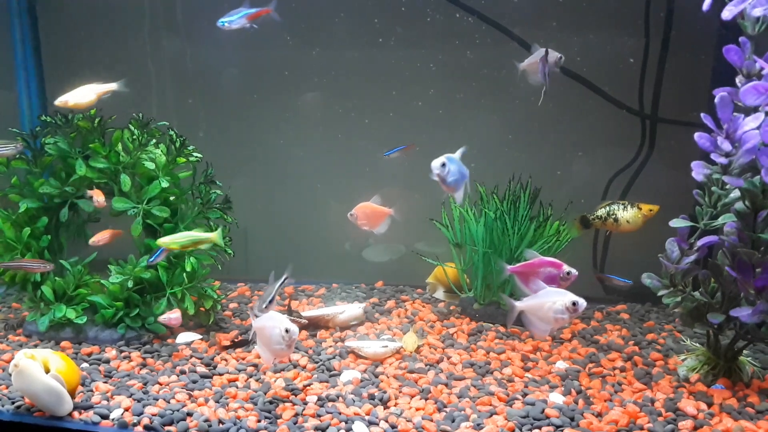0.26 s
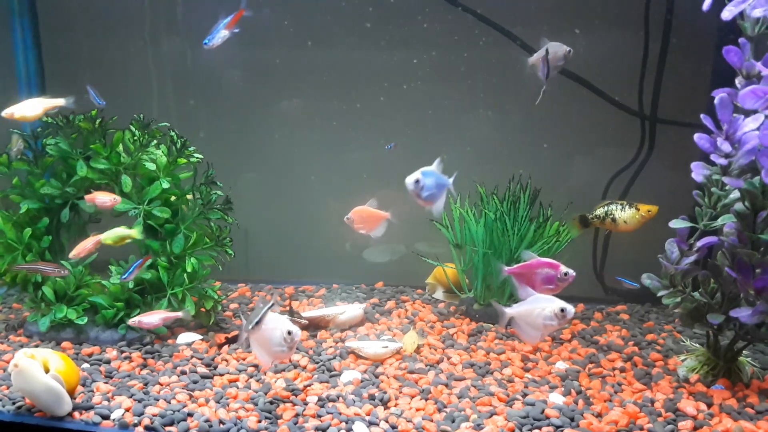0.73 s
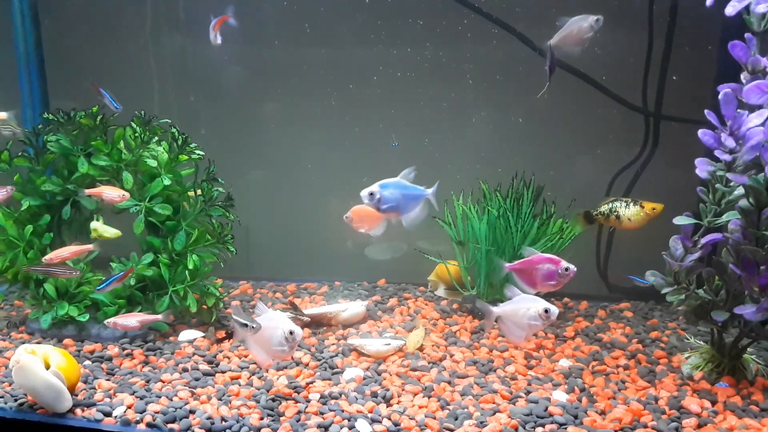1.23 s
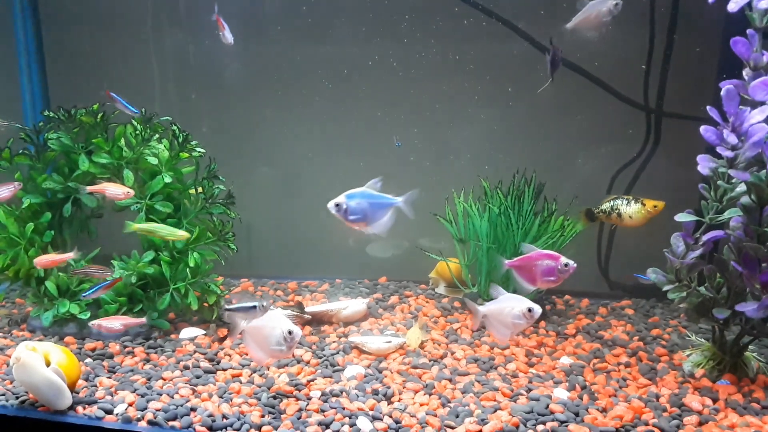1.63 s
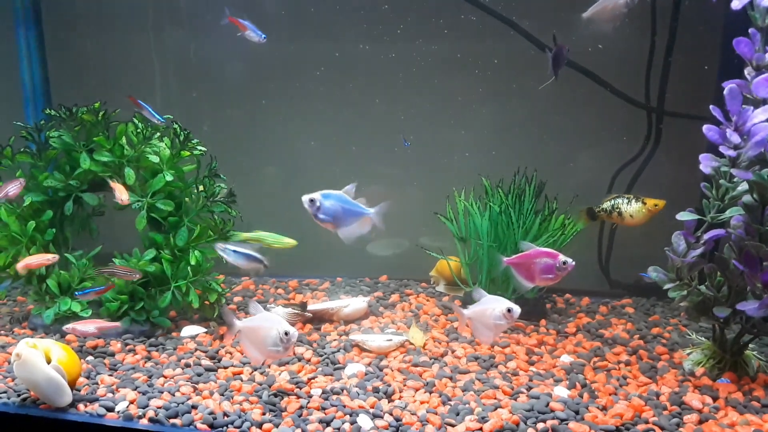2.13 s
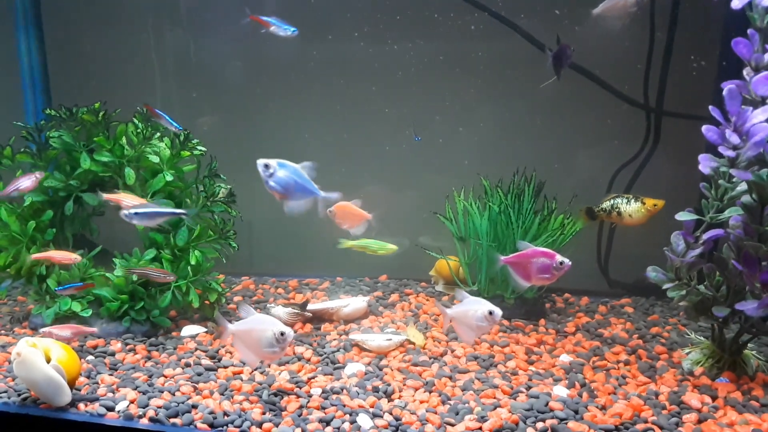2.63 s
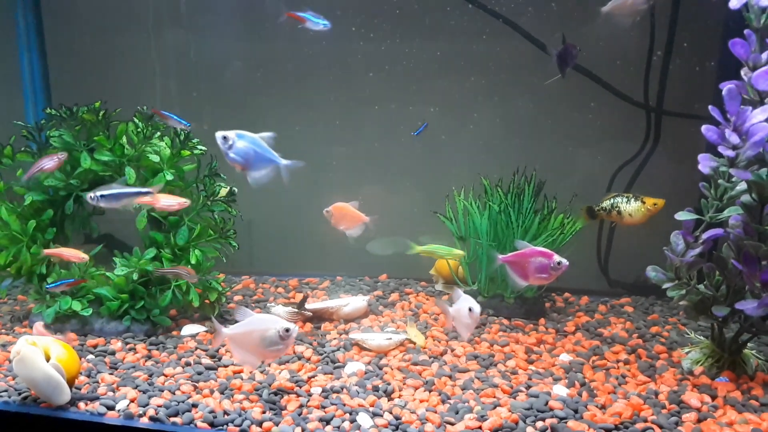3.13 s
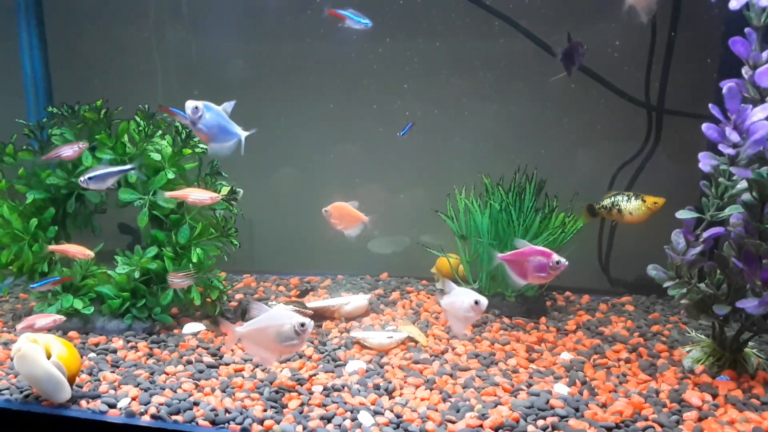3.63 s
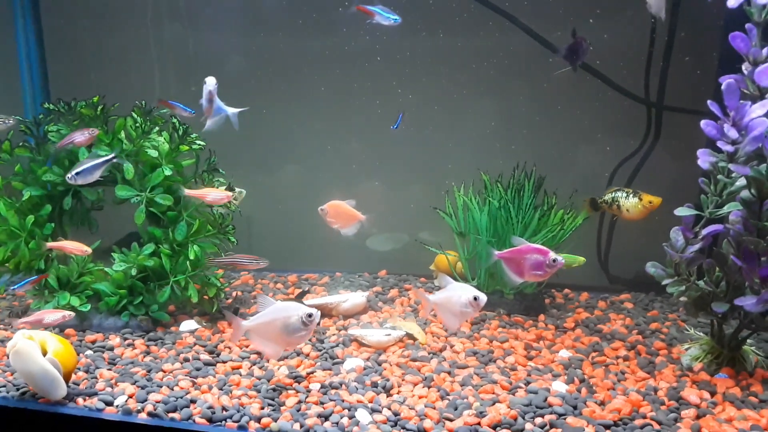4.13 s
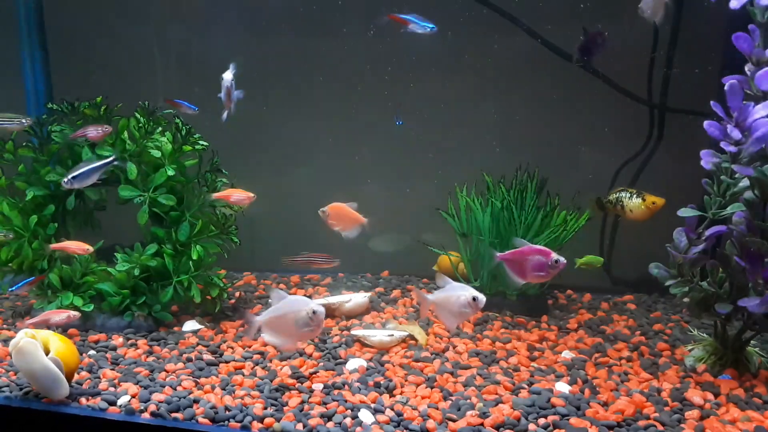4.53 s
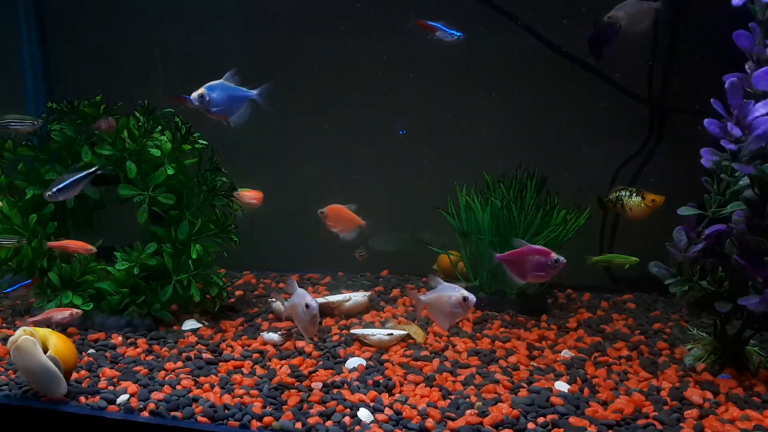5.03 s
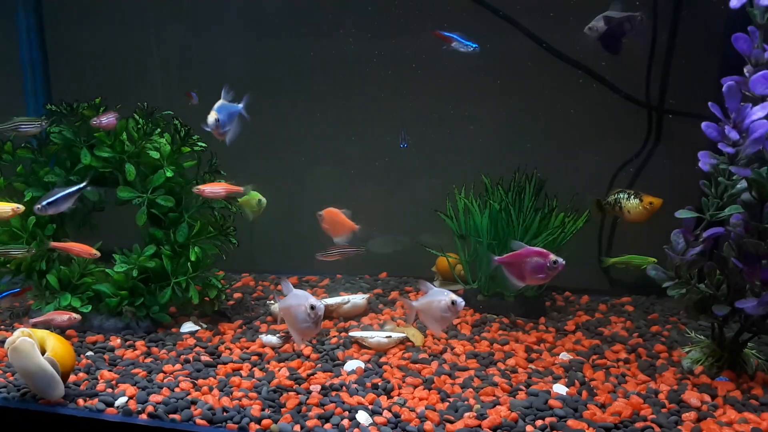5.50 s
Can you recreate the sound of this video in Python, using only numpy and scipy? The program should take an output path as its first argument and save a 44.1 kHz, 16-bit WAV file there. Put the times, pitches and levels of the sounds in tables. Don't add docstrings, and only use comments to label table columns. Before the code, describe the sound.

A very quiet, close stereo sound of a home aquarium, about six seconds long. From start to end a pump hums at one low, unwavering pitch near 200 Hz, with soft low rumble from its case and the room and a little hiss, stronger at left. Bubbles burst constantly but irregularly at the surface: tiny high ticks, bright wet plinks and a few rounder, lower pops, over a thin continuous fizz. They lean right, and the lid and small room give them a short, slightly resonant smear. Clearer pops stand out around 2.3, 2.6 and 5.5 seconds, with busy little clusters near 1.0 and 4.6. A lone soft knock on the wooden stand comes at 3.4, then a loose group of dull low knocks from 3.9 to 4.2, another around 4.6, and a deep, longer thud at 5.7. The hum simply continues to the end.

```python
import sys
import numpy as np
from scipy import signal
from scipy.fft import rfft, irfft
from scipy.io import wavfile

SR = 44100
rng = np.random.default_rng(int(sys.argv[2]) if len(sys.argv) > 2 else 0)


def nominal_scale(level):
    x = np.asarray(level, float) / 20
    return 10 ** x


def dump(signal):
    limited = np.clip(np.atleast_2d(signal).T, -1, 1)
    pcm = np.round(limited * 32767).astype(np.int16)
    wavfile.write(sys.argv[1], SR, pcm)


N = 254016

HUM_HZ = [150.1, 200.134, 400.268, 387.6]
# level_db (rms), left_minus_right_db
HUM_LEVELS = [(-87, -13.5), (-50, 2), (-89.5, 3), (-77.5, -0.5)]
HUM_LEAD_RAD = 0.082

# start_s, peak_db, pitch_hz
LARGE = [(0.045, -57, 975), (0.159, -62, 1060), (0.48, -62, 1380), (1.03, -60, 995), (1.28, -61, 910),
         (1.5, -65, 1040), (1.84, -67, 1180), (1.934, -59, 1110), (2.547, -61.5, 1280), (2.644, -61, 1150),
         (2.774, -64, 1140), (2.85, -61.5, 1130), (3.13, -63, 1070), (3.548, -61, 918), (3.816, -59, 1000),
         (4.068, -57, 945), (4.258, -62, 945), (4.463, -61.5, 1320), (4.578, -62, 970), (4.639, -55, 1330),
         (4.803, -63.5, 955), (4.861, -62, 910), (5.082, -56.5, 1050), (5.581, -61, 1090)]
# start_s, peak_db, pitch_hz
MIDDLING = [(0.0644, -46, 2460), (0.3863, -58, 2360), (1.0426, -54, 2080), (1.045, -62, 1680),
            (1.483, -56.5, 2360), (1.8073, -56.5, 2470), (2.3361, -44, 1950), (2.6419, -41.5, 2010),
            (2.771, -56, 1640), (2.895, -60, 2020), (3.1413, -54.5, 1600), (3.352, -53, 1770),
            (3.4437, -48.5, 2310), (3.6, -58, 2190), (4.134, -53.5, 2060), (4.1844, -53.5, 2170),
            (4.2447, -57.5, 1590), (4.638, -53.5, 1690), (4.85, -60, 1640), (4.9748, -54, 2510),
            (5.0714, -60, 1620), (5.35, -63, 1600), (5.4932, -43.5, 2230),
            (0.0337, -46.5, 2580), (0.133, -54, 2850), (0.2437, -49.5, 2610), (0.6519, -52.5, 3570),
          (0.7986, -55.5, 3000), (0.872, -56, 3600), (0.9, -55.5, 2550), (1.06, -52, 2800),
          (1.1708, -52.5, 2840), (1.2638, -48.5, 2720), (1.271, -48, 3060), (1.479, -50, 3310),
          (1.9856, -49, 3240), (2.153, -51.5, 3770), (2.2826, -50, 2700), (2.619, -48.5, 3020),
          (2.645, -44.5, 2980), (3.263, -58.5, 2730), (3.5415, -51.5, 3110), (3.7269, -60, 2780),
          (3.7714, -61, 2620), (3.8612, -52.5, 3320), (4.5787, -52, 2530), (4.6325, -47.5, 3120),
          (4.9347, -57, 3070), (5.097, -58.5, 3040), (5.135, -63, 2780), (5.452, -59, 3300),
          (5.5537, -46.5, 3240)]
# start_s, peak_db
SHARED_4K3 = [(0.0353, -54), (0.1023, -54), (0.1416, -51), (0.6512, -60), (1.044, -53.5), (1.3881, -50),
              (1.477, -49.5), (1.6832, -52), (1.8308, -57.5), (1.952, -53.5), (2.087, -52), (2.1655, -55.5),
              (2.3073, -48), (2.6413, -51), (3.0979, -51), (3.267, -55), (3.3731, -54), (3.509, -56),
              (3.6606, -49), (3.8137, -51), (3.9869, -52), (4.2075, -52.5), (4.3894, -50.5), (4.5732, -52),
              (4.635, -52), (4.753, -53), (5.1336, -50.5), (5.1724, -51.5), (5.3562, -51.5), (5.4205, -53)]
SHARED_4K3_HZ, SHARED_4K3_SCATTER = 4300, 0.048
# start_s, peak_db
SHARED_6K8 = [(0.2453, -66), (0.4867, -54), (0.7683, -60), (0.808, -48), (0.9498, -58), (1.058, -50),
              (1.1617, -54), (1.482, -52), (1.6798, -64), (1.9054, -53.5), (2.2802, -58.5), (2.4763, -55),
              (2.6433, -51.5), (2.8816, -65), (3.2231, -57.5), (3.267, -50.5), (3.4241, -56), (3.484, -51.5),
              (3.615, -59), (3.7927, -54.5), (4.3234, -55), (4.5306, -48.5), (4.6333, -50), (5.1718, -52),
              (5.2915, -54), (5.451, -61), (5.4919, -53), (5.5603, -55), (5.7173, -56)]
SHARED_6K8_HZ, SHARED_6K8_SCATTER = 6820, 0.072
# start_s, peak_db, pitch_hz
TINY = [(0.0348, -57.5, 10200), (0.1292, -57, 10500), (0.243, -57.5, 10200), (0.403, -56, 9600),
        (0.5, -59.5, 14800), (0.577, -59, 14000), (0.8041, -59, 9200), (1.053, -58.5, 14800),
        (1.1638, -57, 10100), (1.2181, -65, 14800), (2.2466, -58, 13500), (2.5445, -64, 14800),
        (2.9352, -52.5, 12200), (3.2337, -61, 11000), (3.2713, -61, 10500), (3.4256, -61, 11800),
        (3.679, -61.5, 12700), (3.806, -60, 10200), (3.8625, -56.5, 8500), (4.122, -58, 9400),
        (4.2856, -69, 14800), (4.3794, -59.5, 10400), (4.6308, -54, 11600), (4.77, -61, 12100),
        (4.8452, -64, 11000), (5.0918, -57.5, 13000), (5.217, -59.5, 10400), (5.364, -59, 11300),
        (5.447, -58, 11500), (5.6775, -55, 9600)]
# start_s, peak_db, pitch_hz
MIXED = [(0.27, -54, 2810), (0.3, -67, 1510), (0.44, -62, 3460), (0.8, -48, 5540), (1.075, -54, 2310),
         (1.1, -65, 1070), (1.164, -48, 5600), (1.267, -54, 4140), (2.31, -58, 5370),
         (2.545, -68, 2770), (2.79, -53.5, 4300), (2.832, -65.5, 11060), (3.375, -53, 3130),
         (3.87, -64, 1300), (4.145, -62, 954), (4.326, -51.5, 5400), (4.64, -52, 2300), (4, -56, 2320),
         (4.75, -59, 1710), (4.85, -57, 7000), (4.8574, -56.5, 4470), (4.97, -62, 7000),
         (5.2495, -62, 2850), (5.2809, -51, 4070)]
# pitch_hz, cycles (to -60 dB)
RING_CYCLES = [(1000, 42), (2100, 36), (3000, 23), (4300, 5), (5400, 40), (6800, 4.5), (10500, 9.5)]
# pitch_hz, left_minus_right_db
SHADOW = [(1000, -2.5), (1600, 2), (2300, -3.5), (3200, -10.5), (4300, -17), (5400, -8), (6400, -12),
          (7000, -20.5), (14800, -25)]
PLACE_SCATTER_DB = 3
FIZZ_DB = [-73.5, -60.5]

# frequency_hz, level_db (per Hz)
LEFT_PORT = [(700, -7), (1500, -4), (2600, -2), (3500, -4.5), (4400, -11.5), (5000, -14.5), (5900, -1.5),
             (6600, -3), (7200, -17), (8000, -29), (12000, -24), (15500, -15)]
# frequency_hz, level_db (per Hz)
RIGHT_PORT = [(900, -25.5), (1800, -18.5), (3300, -14.5), (3900, -5.5), (4400, 1.5), (4850, -8),
              (5300, -15.5), (5800, -18.5), (6250, -6), (7150, -0.5), (7750, -7.5), (8150, -21.5),
              (10900, -19.5), (15500, -23)]
PORTS = (LEFT_PORT, RIGHT_PORT)
# centre_hz, width_hz, lift_db
CAVITY = [(1000, 21, 12.5), (4850, 14.5, -22), (6330, 68, 8), (7060, 17, 8), (14800, 190, 10.5)]
# frequency_hz, t60_s
ROOM = [(800, 0.2), (2500, 0.22), (6000, 0.18), (14000, 0.28)]
LID_HZ = [1760, 1955, 2068, 2208, 2470, 2846, 3024, 3234, 3601, 3748, 4242, 4346, 4492, 6758]
LID_T60_S, LID_DB = 0.18, 6.5
DIRECT_DB, DIRECT_S = 11, 0.003

# start_s, peak_db, pitch_hz, ring_cycles, panel_db
KNOCKS = [
    (3.388, -49, 85, 3.5, -23),
    (3.907, -45.5, 104, 8.4, -18),
    (4.066, -47.5, 112, 14, -4),
    (4.1, -62, 100, 8, -5),
    (4.141, -47, 83.4, 6.7, -12),
    (4.19, -51.5, 80, 7.1, -5.5),
    (4.575, -48, 95, 5.2, -34),
    (4.644, -64, 110, 4.0, 12.5),
    (5.712, -57, 63, 32, -24),
]
KNOCK_PAN_DB = -6
CONTACT_S = 0.0021

# frequency_hz, level_db (per Hz)
RUMBLE = [(22, -15), (45, -4.5), (62, -4.5), (100, -2), (150, 2.5), (185, 4), (230, 2), (300, -3),
          (340, -12.5), (420, -15.5), (600, -18.5), (1000, -21.5), (2000, -36)]
RUMBLE_DB = -65.5
# frequency_hz, likeness (0-1)
LIKENESS = [(40, 0.9), (70, 0.8), (130, 0.1), (200, 0.3), (300, 0.63), (600, 0.23), (1400, 0.07)]
# centre_hz, width_hz, level_db (rms), left_minus_right_db
CASE = [(190, 11.6, -65.5, 5.5), (367.5, 21.4, -79, 10)]
HISS_DB = [-76, -93.5]


def at_hz(points, hz):
    table = np.array(points)
    return np.interp(np.log(np.maximum(hz, 1)), np.log(table[:, 0]), table[:, 1])


def rms_one(x):
    return x / np.sqrt(np.mean(x ** 2, axis=-1, keepdims=True) + 1e-20)


def sides(pan_db):
    return nominal_scale(np.array([[0.5], [-0.5]]) * pan_db)


def resonance(hz, centre_hz, width_hz):
    return 1 / (1 + ((hz - centre_hz) / width_hz) ** 2)


def coloured(noise, spectrum):
    hz = np.arange(len(noise) // 2 + 1) * SR / len(noise)
    return irfft(rfft(noise) * nominal_scale(at_hz(spectrum, hz)), len(noise))


def ring(clicks, hz, t60):
    decay = nominal_scale(-60 / (t60 * SR))
    turn = 2 * np.pi * min(hz, SR / 2.1) / SR
    feedback = [1, -2 * decay * np.cos(turn), decay * decay]
    return signal.lfilter([0, np.sin(turn)], feedback, clicks + 1e-18)


def pump():
    t = np.arange(N) / SR
    lead = np.array([[HUM_LEAD_RAD], [0]])
    hum = 0
    for hz, (db, pan) in zip(HUM_HZ, HUM_LEVELS):
        hum = hum + np.sqrt(2) * nominal_scale(db) * sides(pan) * np.sin(2 * np.pi * hz * t + lead)
    return hum


def pitched(rows, hz, scatter):
    return [(s, db, hz * (1 + scatter * rng.uniform(-1, 1))) for s, db in rows]


def pops(places, rise, onset_cycles):
    out, t = np.zeros((2, N + SR)), np.arange(SR // 20) / SR
    alike = pitched(SHARED_4K3, SHARED_4K3_HZ, SHARED_4K3_SCATTER) + pitched(SHARED_6K8, SHARED_6K8_HZ, SHARED_6K8_SCATTER)
    bubbles = LARGE + MIDDLING + alike + TINY + MIXED
    for k, (s, db, hz) in enumerate(bubbles):
        turns, cycles = hz * t, at_hz(RING_CYCLES, hz)
        pan = at_hz(SHADOW, hz) + PLACE_SCATTER_DB * rng.uniform(-1, 1)
        swell = np.sin(np.pi / 2 * np.minimum(turns / onset_cycles, 1)) ** 2
        tone = np.sin(2 * np.pi * turns * (1 + rise * turns / cycles))
        tone = tone * nominal_scale(-60 * turns / cycles) * swell
        echo = places[k % len(places)][:, :SR // 4]
        heard = signal.fftconvolve(tone[None], echo, axes=1)
        start = round((s - DIRECT_S) * SR)
        out[:, start:start + heard.shape[1]] += nominal_scale(db) * sides(pan) * rms_one(heard)
    return out[:, :N]


def fizz(places, per_s, spread_db, cycles):
    bursts = rng.random(N) < per_s / SR
    sizes = nominal_scale(spread_db * np.minimum(rng.exponential(1, N), 3)) * bursts
    pitches, dealt = np.geomspace(700, 16000, 36), rng.integers(0, 36, N)
    rings = [hz * ring(sizes * (dealt == k), hz, cycles / hz) for k, hz in enumerate(pitches)]
    out = 0
    for k, echo in enumerate(places):
        here = sum(rings[k::len(places)])
        out = out + signal.fftconvolve(here[None], echo, axes=1)[:, :N]
    return rms_one(out)


def room_echoes(port, swell_s):
    t = np.arange(SR // 2) / SR
    spectrum = rfft(coloured(rng.standard_normal(len(t)), port))
    hz, out = np.arange(len(t) // 2 + 1) * 2.0, 0
    edges = 250 * 2.0 ** np.arange(8)
    for low, high in zip(edges, edges[1:]):
        band = irfft(spectrum * (hz >= low) * (hz < high), len(t))
        out = out + band * nominal_scale(-60 * t / at_hz(ROOM, 1.4 * low))
    building = 1 - 0.62 * np.exp(-t / swell_s)
    return out * building * (1 - np.exp(-t / 0.0015))


def under_lid(echo):
    resonant_gain = LID_T60_S * SR / (2 * np.log(1000))
    modes = sum(ring(echo, hz, LID_T60_S) * rng.uniform(0.3, 1) for hz in LID_HZ)
    return echo + nominal_scale(LID_DB) / resonant_gain * modes


def cavity(sound):
    hz = np.arange(len(sound) // 2 + 1) * SR / len(sound)
    lift_db = sum(db * resonance(hz, centre_hz, width_hz) for centre_hz, width_hz, db in CAVITY)
    return irfft(rfft(sound) * nominal_scale(lift_db), len(sound))


def place():
    click = nominal_scale(DIRECT_DB) * (np.arange(SR // 2) == round(DIRECT_S * SR))
    left, right = [under_lid(coloured(click, port) + room_echoes(port, swell_s=0.019)) for port in PORTS]
    return np.array([left, cavity(right)])


def knocks(panel_hz, panel_t60):
    out, t = np.zeros((2, N + SR)), np.arange(SR // 3) / SR
    contact = 1 - np.exp(-(t / CONTACT_S) ** 2)
    for s, db, hz, cycles, panel_db in KNOCKS:
        push = np.sin(2 * np.pi * hz * t) * nominal_scale(-60 * t * hz / cycles) * (1 - np.exp(-t * hz * 2))
        panel = np.sin(2 * np.pi * panel_hz * t) * nominal_scale(panel_db - 60 * t / panel_t60)
        dull = signal.lfilter([0.03], [1, -1.8, 0.81], rng.standard_normal(len(t)))
        tick = dull * nominal_scale(panel_db - 60 * t / 0.056)
        start = round(s * SR)
        knock = (1.24 * push + panel + tick) * contact
        out[:, start:start + len(t)] += nominal_scale(db) * sides(KNOCK_PAN_DB) * knock
    return out[:, :N]


def rumble():
    mid, side = rfft(rng.standard_normal((2, N)))
    hz = np.arange(len(mid)) * SR / N
    alike = np.clip(at_hz(LIKENESS, hz), 0, 1)
    pair = np.sqrt(1 + alike) * mid + np.sqrt(1 - alike) * side * [[1], [-1]]
    out = nominal_scale(RUMBLE_DB) * rms_one(irfft(pair * nominal_scale(at_hz(RUMBLE, hz)), N))
    for centre_hz, width_hz, db, pan in CASE:
        flow = rfft(rng.standard_normal(N))
        shaken = irfft(flow * resonance(hz, centre_hz, width_hz), N)
        out = out + nominal_scale(db) * sides(pan) * rms_one(shaken)
    return out


def scene():
    places = [place() for spot in range(6)]
    froth = fizz(places, per_s=600, spread_db=3.6, cycles=12.0)
    foam = nominal_scale(np.array(FIZZ_DB))[:, None] * froth
    water = nominal_scale(-23) * pops(places, rise=0.013, onset_cycles=1.51) + foam
    return pump() + water + knocks(panel_hz=297, panel_t60=0.096) + rumble()


def low_pass(x):
    return signal.sosfilt(signal.butter(12, 15770, fs=SR, output="sos"), x)


def record(dry):
    hiss = nominal_scale(np.array(HISS_DB))[:, None] * rng.standard_normal(dry.shape)
    bass_cut = signal.butter(3, 40, "high", fs=SR, output="sos")
    mix = signal.sosfilt(bass_cut, dry + hiss)
    return low_pass(mix)


dry = scene()
out = record(dry)
dump(out)
```